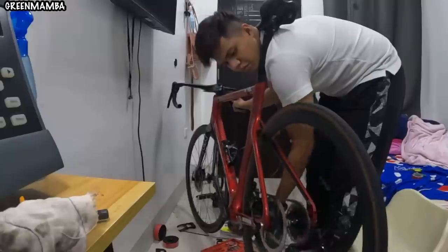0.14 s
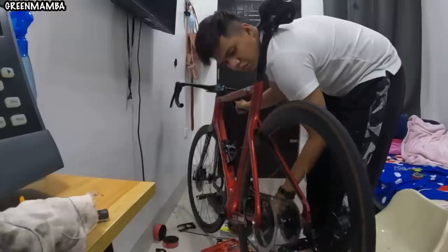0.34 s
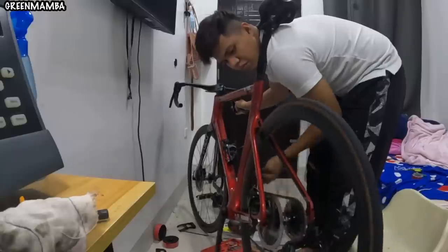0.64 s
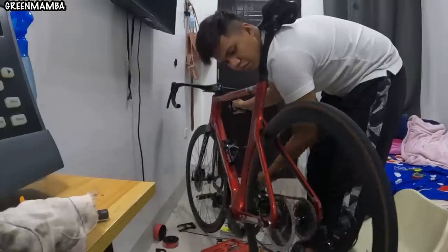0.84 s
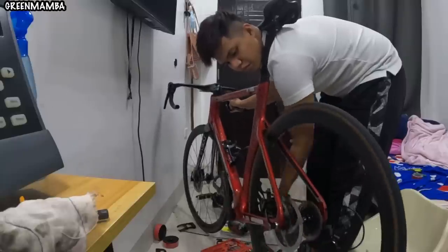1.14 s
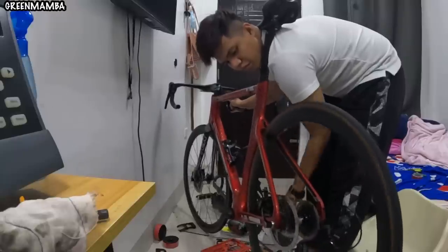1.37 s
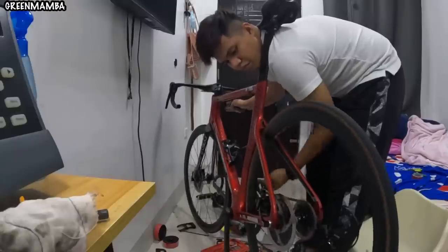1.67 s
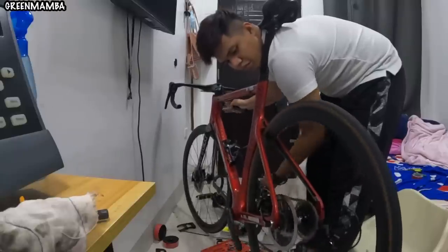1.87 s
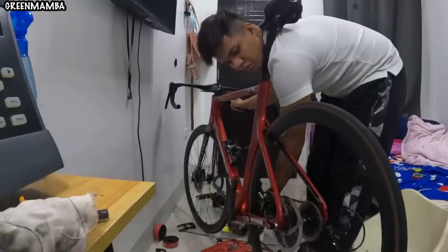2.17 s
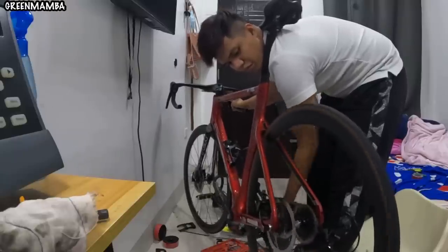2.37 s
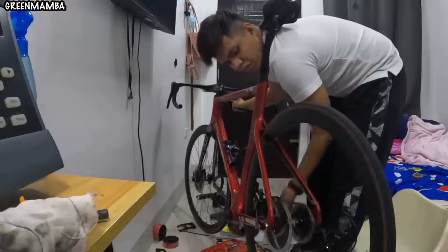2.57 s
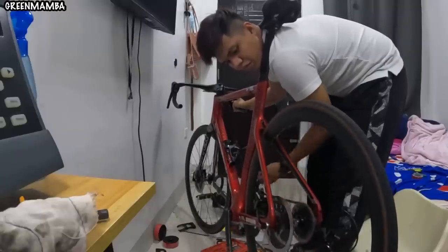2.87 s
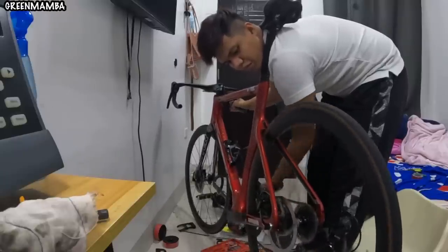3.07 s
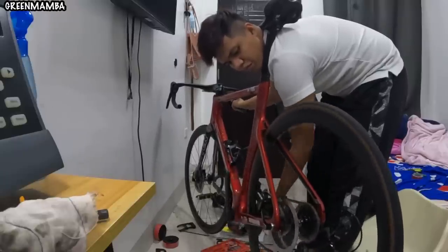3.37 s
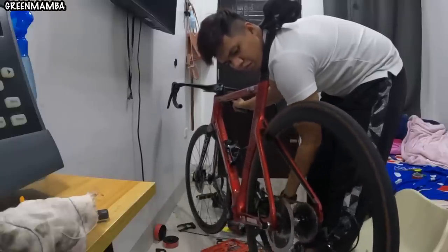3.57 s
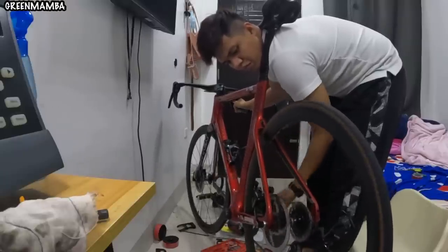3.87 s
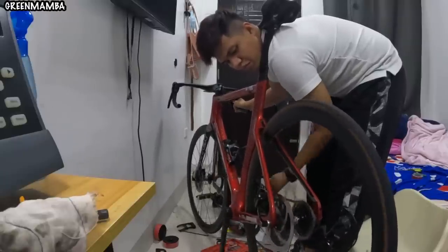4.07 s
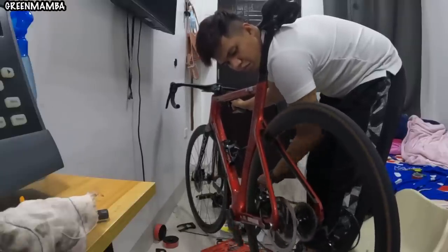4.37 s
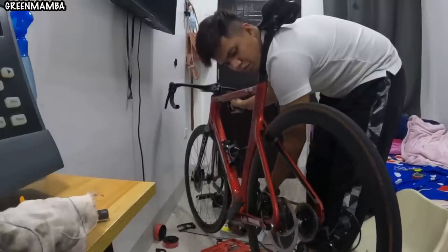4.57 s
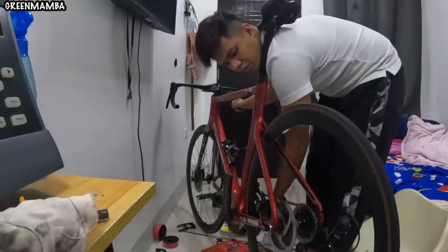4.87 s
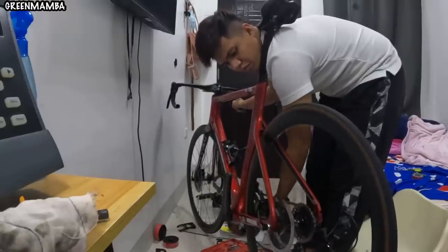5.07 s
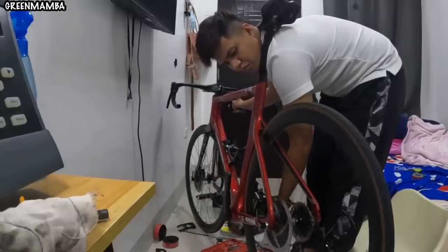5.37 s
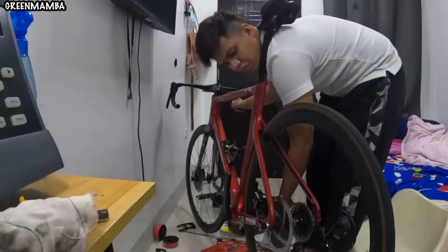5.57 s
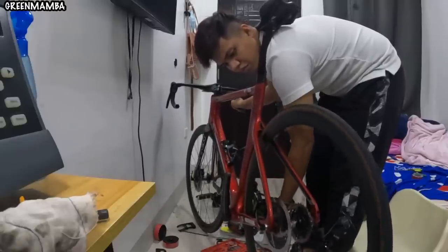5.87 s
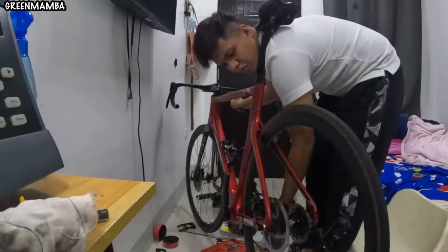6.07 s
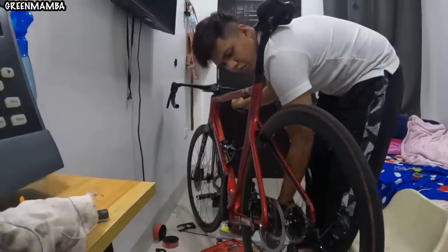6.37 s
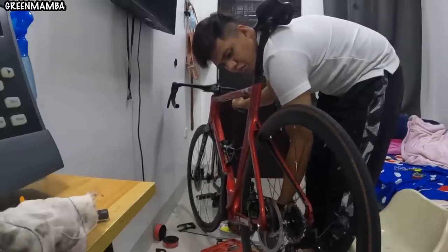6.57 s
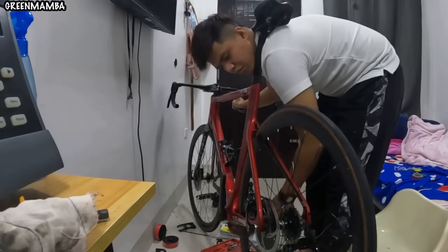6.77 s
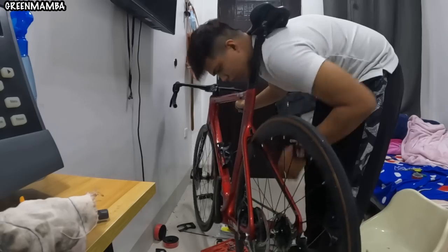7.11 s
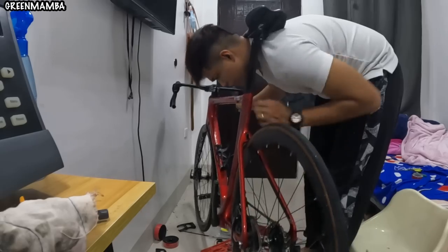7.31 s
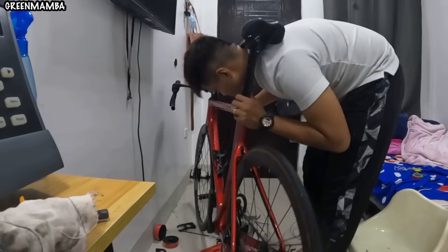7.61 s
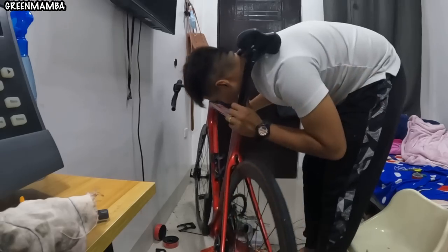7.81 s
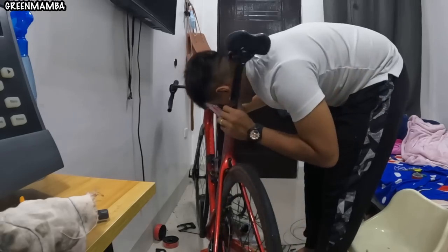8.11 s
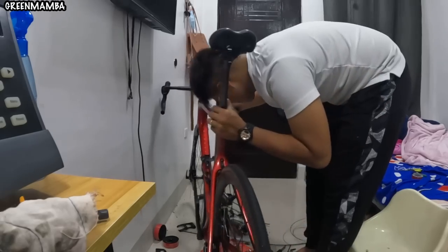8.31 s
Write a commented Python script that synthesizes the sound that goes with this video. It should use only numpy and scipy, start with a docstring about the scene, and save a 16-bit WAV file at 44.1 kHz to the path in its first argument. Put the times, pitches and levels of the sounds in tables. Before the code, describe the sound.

A close stereo microphone indoors catches a bicycle freehub ticking in uneven bursts, broken by short knocks and faint chain ticks. Low puffs of air and a faint distant motor drone lie beneath. After a clunk and a quick dying rattle, the ratchet accelerates into a dense ringing whirr, holds, then slows click by click. The end is quiet, with a small snap, a few light rubs and soft room air.

```python
"""Bicycle crank turned backwards

A bicycle stands in a small room and its crank is turned backwards by hand, in pushes and then in one long spin.
Spring-loaded pawls drop over the ratchet teeth, singly or as a buzz; each drop is a tiny noise burst that rings the hub.
The chain rustles in small ticks, the drivetrain knocks in the frame, and small parts snap and rattle.
Beneath lie room air, a low uneven rumble (both shaped noise) and the faint drone of a far motor (sine waves)."""
import sys
import numpy as np
from scipy import signal
from scipy.fft import rfft, irfft, next_fast_len
from scipy.io import wavfile
from scipy.ndimage import uniform_filter1d

SR = 44100
rng = np.random.default_rng(int(sys.argv[2]) if len(sys.argv) > 2 else 0)


def bounce(signal):
    """Save signal as a 16-bit WAV file at the path given by the first command-line argument."""
    frames = np.transpose(np.atleast_2d(signal))
    limited = np.clip(frames, -1, 1)
    pcm = np.round(limited * 32767).astype(np.int16)
    wavfile.write(sys.argv[1], SR, pcm)


N = 372644
TIME = np.arange(N) / SR
SIZE = next_fast_len(N + SR)
HZ = np.maximum(np.arange(SIZE // 2 + 1) * SR / SIZE, 1)

# All levels and strengths are relative settings; the mix and the room act on them later.
# Knocks of crank, chain and frame: t/s, strength/dB, main resonance f/Hz, bass/dB, clatter decay/ms
KNOCKS = [(.103, -27, 1360, 2.5, 6.2), (0.343, -28.5, 1440, 0, 7.9), (.53, -36.5, 330, 1, 13),
          (0.944, -29, 2580, -4, 8), (.953, -22.5, 2100, 7, 10), (.992, -25, 2480, -1, 9.3),
          (1.671, -21, 1600, -6, 9.5), (1.803, -24.5, 1650, -30, 1.8), (1.860, -30.5, 1310, 19, 12),
          (1.947, -23.5, 2780, -3, 13), (1.979, -19.5, 1670, -3.5, 6.1), (3.005, -31.5, 1430, 1.5, 4.1),
          (3.138, -20.5, 1620, -12, 7.2), (3.308, -19.5, 1720, -4.5, 7.3), (3.759, -32, 730, 5, 16),
          (3.879, -23, 2020, -4, 8.7), (3.892, -18.5, 1830, 6, 14), (6.950, -28.5, 1320, 5.5, 8.6),
          (8.429, -36.5, 1370, 8, 4.2)]
# One hollow clunk: t/s, strength/dB, contact decay/ms
CLUNK = (4.354, -21.5, 7)
# Its resonances: f/Hz, width/Hz, lift/dB
CLUNK_MODES = [(920, 170, 16), (1015, 120, 13), (1220, 170, 12), (1420, 130, 15), (3570, 400, 8)]
# Dry snaps of small parts, most in the gear change before the long spin:
# t/s, strength/dB, contact decay/ms, dull above f/Hz
SNAPS = [(4.4479, -24.5, 2, 5000), (4.4806, -28.5, 1, 9500), (4.498, -28.5, 1.5, 9500),
         (4.576, -35, 1.8, 6000), (6.9488, -31, 1.14, 5230)]
# The chain drops onto the next sprocket with a dying rattle:
# t/s, strength of first link/dB, time between links/s, loss per link/dB
SHIFT_RATTLE = (4.511, -29.5, .0065, 1.3)
# Far motor: t/s, base f/Hz, level/dB
MOTOR = [(2.4, 99.5, -62), (2.8, 102.5, -44), (4.1, 101.9, -46), (4.85, 104.9, -36.5), (5.5, 107.8, -48.5),
         (6.2, 101.6, -44), (6.9, 102.2, -54)]
# Its tones: multiple of the base f, level/dB
MOTOR_TONES = [(0.99, 0), (4 / 3, -5.5), (2.1, -17)]

# Broad colours of hub, frame, chain links, cloth, hollow part, small parts, rumble and room air: f/Hz, level/dB
HUB = [(150, -35), (500, -34.5), (900, -18), (1600, -7.5), (4900, -8), (6000, -3), (7150, 3.5),
       (8400, -4.5), (10000, -5), (12200, -9), (13500, -15), (15000, -47)]
FRAME = [(60, -14), (250, -6.5), (520, -3), (900, -2.5), (3500, -0.5), (5500, -3), (8000, -6), (12000, -37),
         (16000, -57)]
LINKS = [(100, -7), (350, -5.5), (1800, 1), (7000, 3), (10000, 1.5), (13000, 0.5), (15000, -46)]
CLOTH = [(150, -6.5), (1100, -5), (2000, -6), (5000, -12.5), (12000, -22), (15000, -60)]
HOLLOW = [(100, -21), (600, -8), (900, -4), (2300, -4.5), (5500, 1.5), (8000, -18), (14000, -33)]
SNAP = [(200, -21), (2200, -10.5), (3500, 5.5), (7000, 9), (12000, -4), (15000, -25)]
LOWS = [(25, -1), (42, 1), (55, 2.5), (100, -11.5), (160, -17), (400, -59)]
AIR = [(50, -71), (140, -72), (250, -81.5), (500, -83), (800, -90), (2000, -90), (7600, -96.5),
       (8800, -108), (12500, -114), (14500, -140)]
# Resonances of hub, frame and room air: f/Hz, width/Hz, lift/dB
HUB_MODES = [(1755, 180, 3.5), (2446, 190, 4.5), (3100, 290, 6), (3542, 46, 7.5), (4008, 52, 13.5),
             (4157, 45, 12), (4740, 74, 8), (5450, 96, 8), (6750, 100, 2), (8660, 130, 4.5), (9620, 210, 5)]
FRAME_MODES = [(305, 39, 8.7), (658, 7, 13), (1170, 44, 2.7), (1550, 79, 4), (2010, 6.9, 11),
               (2570, 120, 8.7), (3450, 170, 2.8), (4030, 180, 4.1)]
AIR_MODES = [(357, 5, 11.4), (417.6, 3.5, 10.5)]
# The hub's strongest ring comes and goes. Its band: lower f/Hz, upper f/Hz
RING_BAND_HZ = (3850, 4300)
# Gain of that band: t/s, level/dB
RING_SWELL = [(3.9, -1), (4.58, 1), (4.76, 7.5), (4.88, -1), (5.08, -1.5), (5.4, 3), (5.6, -2),
              (5.67, -8.5), (5.75, -1), (5.96, 1.5), (6.05, 1), (6.48, -4.5), (6.62, -8)]
# How far a knock's main resonance stands out: f/Hz, lift/dB
MAIN_LIFT = [(800, 15), (1400, 6), (1620, 11), (2100, 4)]

# Time the room takes to fade by 60 dB: f/Hz, fade time/s
ROOM_T60 = [(150, 0.62), (800, 0.51), (2500, 0.51), (6000, 0.45), (13000, 0.16)]
# How alike left and right are in sound from all around: f/Hz, likeness (1 = the same)
LIKENESS = [(30, 0.81), (150, 0.98), (800, 0.73), (1600, 0.68), (2600, 0.47), (4500, 0.48), (7000, 1),
            (10000, 0.66), (13000, 0.099)]
# Puffs of stirred air on the microphone: t/s, level/dB
PUFFS = [(.13, -28), (.34, -24.5), (.82, -27.5), (1.02, -27), (1.2, -25.5), (2.685, -22), (3.139, -27.5),
         (3.6, -27.5), (3.73, -23), (5.75, -28)]
# Jolts that set the whole frame booming: t/s, level/dB
BOOMS = [(1.68, -31), (1.99, -26.5), (3.316, -25)]
# Hands and clothes brushing the bicycle: start t/s, length/s, level/dB, release/s, main f/Hz, its lift/dB
BRUSHES = [(0, 4.8, -43.5, 1.0, 690, -0.5), (2.808, 0.04, -39.5, 0.073, 4500, 7),
           (6.829, 0.08, -47, .025, 1300, 8), (6.91, 0.047, -44, 0.013, 5240, 19.5),
           (7.101, .025, -47, .03, 1080, 21), (7.161, 0.055, -48.5, 0.03, 1060, 14),
           (7.768, 0.019, -52, 0.014, 3200, 14)]

# Pushes on the crank; the pace changes evenly up to a turning point and evenly again after it:
# first tooth t/s, turning point t/s, last tooth t/s, teeth, start pace, end pace (turning-point pace = 1)
PUSHES = [(0.013, 0.336, 0.506, 33, 0.41, 0.38), (0.532, 0.666, 0.78, 11, 0.77, 0.52),
          (0.941, 0.958, 1.017, 4, 3.93, 1.29), (1.173, 1.359, 1.399, 8, 0.87, 0.48),
          (1.668, 1.702, 1.765, 3, 0.82, 0.48), (1.804, 1.963, 2.12, 16, 0.67, 0.08),
          (2.433, 2.531, 2.615, 4, 0.8, 0.85), (3.13, 3.263, 3.439, 12, 0.35, 0.72),
          (3.469, 3.749, 3.806, 15, 0.68, 0.5), (3.874, 3.896, 4.068, 8, 3.85, 1.27),
          (4.104, 4.246, 4.356, 10, 0.86, 0.41)]
# The long spin gathers speed, holds and runs down: t/s, speed/(teeth per s)
SPIN = [(4.586, 27.2), (4.893, 70.7), (5.049, 118.1), (5.208, 107.3), (5.621, 105.9), (6.116, 78.5),
        (6.33, 55.1), (6.626, 8.2)]
SPIN_TEETH = 162

# Below the first rate the teeth click singly, above the second they merge into a buzz (teeth per s)
SINGLE_RATE, BUZZ_RATE = 25, 55
# In a buzz the teeth come very evenly and the pawls drop almost together
TOOTH_JITTER_S, BUZZ_SPREAD_S, PAWL_DECAY_MS = .00012, .002, 1.6
# A shorter contact is brighter: clatter giving the frame's plain treble, and treble gained at each halving
PLAIN_CLATTER_MS, TREBLE_DB_PER_HALVING = 6.2, 5
# The chain is louder the faster it runs: level at 100 teeth per s, rise, creep between pushes (teeth per s)
CHAIN_DB, CHAIN_DB_PER_DOUBLING, CREEP_RATE = -37.5, 2.5, 7.5
BRUSH_ATTACK_S, BRUSH_WIDTH_SHARE = 0.0024, 0.24
# Share of the snaps and lone ticks sent into the room step; the rest skips it
SNAP_ROOM_SHARE = .68
AIR_DB, CUTOFF_HZ = -46, 15900


def amp(db):
    """Turn decibels into a gain."""
    return 10 ** (np.asarray(db) / 20)


def rms_one(x):
    """Scale a sound to an average strength (rms) of 1."""
    return x / np.sqrt(np.mean(x ** 2) + 1e-20)


def in_time(rows):
    """Read each column of a timed table at every sample."""
    s, *columns = np.transpose(rows)
    return [np.interp(TIME, s, column) for column in columns]


def at_hz(points, hz):
    """Read a table between its points, along log frequency."""
    f, value = np.transpose(points)
    return np.interp(np.log(hz), np.log(f), value)


def colour(points, modes, hz):
    """A broad spectrum in dB with resonance peaks on it."""
    peaks = sum((amp(lift) ** 2 - 1) / (1 + (2 * (hz - f) / width) ** 2) for f, width, lift in modes)
    return at_hz(points, hz) + 10 * np.log10(np.maximum(1 + peaks, 1e-2))


def body(points, modes, size=16384):
    """How a struck body of this colour rings: at once, then fading (minimum phase); its energy is 1."""
    hz = np.maximum(np.arange(size // 2 + 1) * SR / size, 1)
    cepstrum = irfft(np.log(amp(colour(points, modes, hz))))
    # keeping only the forward half of the cepstrum puts the ring after the blow
    forward = 2 * cepstrum[:size // 2] * (np.arange(size // 2) > 0)
    ring = irfft(np.exp(rfft(forward, size)))
    return ring / np.linalg.norm(ring)


def add(track, s, piece):
    """Mix a piece into a track at time s."""
    i = int(np.clip(s * SR, 0, N - 1))
    track[i:i + len(piece)] += piece[:N - i]


def diffuse(points, modes=()):
    """Stereo noise from all around, more alike left and right at some pitches than at others; rms 1."""
    alike = np.clip(at_hz(LIKENESS, HZ), -1, 1)
    mid, side = rfft(rng.standard_normal((2, SIZE))) * amp(colour(points, modes, HZ))
    mid = irfft(mid * np.sqrt(1 + alike), SIZE)
    side = irfft(side * np.sqrt(1 - alike), SIZE)
    return rms_one(np.array([mid + side, mid - side])[:, :N])


def contact(decay_ms, grain_db, size=4096):
    """One impact with its chatter of tiny rebounds; it has the energy of 20 ms of noise with rms 1."""
    grain = np.clip(rng.standard_normal(size), -2, 2)
    chatter = rng.standard_normal(size) * amp(grain_db * grain)
    burst = chatter * np.exp(-TIME[:size] / (max(decay_ms, .1) * 1e-3))
    return burst / np.linalg.norm(burst) * np.sqrt(SR / 50)


def tooth_times(s, pace, count):
    """When each of a run of teeth goes by, for a pace that changes evenly between the times s."""
    t = np.linspace(s[0], s[-1], 2000)
    speed = np.interp(t, s, pace)
    turned = np.cumsum(speed) - speed[0]
    return np.interp(np.linspace(0, turned[-1], count), turned, t)


def ratchet_runs():
    """The tooth times of every push and of the long spin."""
    runs = []
    for first, turn, last, teeth, start_pace, end_pace in PUSHES:
        runs.append(tooth_times([first, turn, last], [start_pace, 1, end_pace], count=int(teeth)))
    return runs + [tooth_times(*np.transpose(SPIN), count=SPIN_TEETH)]


def room(x, early_db=0.0, early_s=0.019, late_db=-2, build_s=0.01, size=4096):
    """Direct sound, quick reflections, then a tail whose treble dies first.
    Wheel and mechanic keep moving, so each short stretch of sound meets a new pattern of reflections."""
    t, noise = TIME[:SR], diffuse([(1, 0), (SR, 0)])
    spectrum, centres = rfft(noise, SIZE), [hz for hz, _ in ROOM_T60]
    # split the noise into overlapping pitch bands, each with its own fade
    bands = [irfft(spectrum * at_hz(list(zip(centres, share)), HZ), SIZE) for share in np.eye(len(centres))]
    decays = [amp(-60 * t / t60) * (1 - np.exp(-t / build_s)) for _, t60 in ROOM_T60]
    early_decay = np.exp(-t / early_s) * (t > .001)
    out, padded = np.zeros((2, N + 2 * SR)), np.pad(x, (size, 2 * size))
    fade = np.sqrt(signal.get_window("hann", 2 * size))
    for i in range(0, N + size, size):
        j = rng.integers(N - SR)  # a random piece of noise is the new pattern
        tail = sum(band[:, j:j + SR] * decay for band, decay in zip(bands, decays))
        early = noise[:, j:j + SR][:, ::-1] * early_decay
        response = (amp(early_db) * rms_one(early) + amp(late_db) * rms_one(tail)) / np.sqrt(SR)
        stretch = padded[i:i + 2 * size] * fade
        echo = signal.fftconvolve(stretch[None], response, axes=1)
        out[:, i:i + echo.shape[1]] += echo
    return (x + out[:, size:size + N]) / np.sqrt(1 + amp(early_db) ** 2 + amp(late_db) ** 2)


def brushing():
    """Cloth or skin rubs as soft noise; each brush swells, holds and dies away, with a pitch of its own."""
    out = 0
    for s, length, db, release_s, hz, lift_db in BRUSHES:
        attack = np.clip((TIME - s) / BRUSH_ATTACK_S, 0, 1)
        release = np.exp(-np.maximum(TIME - s - length, 0) / release_s)
        cloth = diffuse(CLOTH, [(hz, BRUSH_WIDTH_SHARE * hz, lift_db)])
        out = out + amp(db) * attack * release * cloth
    return out


def rumble(steady_db=-41, stirred_db=-41, puff_s=0.034, puff_top_hz=62):
    """A steady low rumble; until the spin ends stirred air adds to it, and deeper puffs reach the microphone."""
    running = TIME < SPIN[-1][0]
    power = amp(steady_db) ** 2 + amp(stirred_db) ** 2 * uniform_filter1d(running * 1., SR // 2)
    puff_power = sum(amp(db) ** 2 * np.exp(-((TIME - s) / puff_s) ** 2) for s, db in PUFFS)
    low_pass = signal.butter(1, puff_top_hz, fs=SR, output="sos")
    deep = rms_one(signal.sosfilt(low_pass, diffuse(LOWS)))
    left_right_gain = amp([[-1], [1]])
    return (np.sqrt(power) * diffuse(LOWS) + np.sqrt(puff_power) * deep) * left_right_gain


def far_motor(waver_db=2):
    """A drone of a few sine tones that rises and sinks a little beyond the walls."""
    hz, level_db = in_time(MOTOR)
    phase = 2 * np.pi * np.cumsum(hz) / SR
    knots = np.linspace(0, N / SR, 40)
    out = np.zeros(N)
    for multiple, db in MOTOR_TONES:
        waver = np.interp(TIME, knots, rng.normal(0, waver_db, len(knots)))
        out += np.sqrt(2) * amp(level_db + db + waver) * np.sin(multiple * phase)
    return out


def room_air():
    """The faint hush of the room: steady noise with two narrow resonances."""
    return amp(AIR_DB) * diffuse(AIR, AIR_MODES)


def loose_links(ticks_per_s=16, tick_db=-47, uneven_db=3):
    """Before the long spin, chain links settle at random moments with faint lone ticks."""
    force = np.zeros(N)
    for s in rng.uniform(0, SPIN[0][0], int(ticks_per_s * SPIN[0][0])):
        tick = contact(decay_ms=1.0, grain_db=8, size=1024)
        add(force, s, amp(tick_db + rng.normal(0, uneven_db)) * tick)
    return signal.fftconvolve(force, body(LINKS, ()))[:N]


def chain_level():
    """Chain level in dB from crank speed; the chain creeps between pushes and all but vanishes after the spin."""
    rate = CREEP_RATE * (TIME < SPIN[0][0])
    for run in ratchet_runs():
        rate = rate + np.interp(TIME, run, 1 / np.gradient(run), left=0, right=0)
    smooth_rate = np.maximum(uniform_filter1d(rate, SR // 20), 1e-4)
    doublings = np.log2(smooth_rate / 100)
    return CHAIN_DB + CHAIN_DB_PER_DOUBLING * doublings


def chain(links_per_s=70, uneven_db=4.5):
    """Rollers seat on the sprockets in a stream of small uneven ticks; crank speed sets only their level."""
    force = np.zeros(N)
    for s in np.arange(0, N / SR, 1 / links_per_s):
        tick = contact(decay_ms=4.6, grain_db=3.5, size=1024)
        add(force, s + rng.normal(0, .003), amp(rng.normal(0, uneven_db)) * tick)
    rustle = signal.fftconvolve(force, body(LINKS, HUB_MODES[:7]))[:N]
    return amp(chain_level()) * rms_one(rustle)


def pawls(tooth_s, level_db, spread_s, count=3):
    """The pawls drop in close succession over one tooth: (s, impact) for each."""
    drops = []
    for k in range(count):
        delay_s = spread_s * (k + rng.normal(0, .25)) / (count - 1) * (k > 0)
        impact = contact(PAWL_DECAY_MS, grain_db=2.5) / np.sqrt(count)
        drops.append((tooth_s + delay_s, amp(level_db + rng.normal(0, 1.0)) * impact))
    return drops


def swell_ring(x):
    """The band of the strongest ring swells and sinks while the rest stays."""
    band_pass = signal.butter(2, RING_BAND_HZ, "band", fs=SR, output="sos")
    ring = signal.sosfiltfilt(band_pass, x)
    return x + (amp(in_time(RING_SWELL)[0]) - 1) * ring


def freehub(tooth_db=-25.5, uneven_db=0.4, slow_spread_s=.0036, slow_db=1.0):
    """Springs snap about equally at every tooth, so faster is louder; hub, cassette and spokes ring."""
    force = np.zeros(N)
    for run in ratchet_runs():
        slowness = np.interp(1 / np.gradient(run), [SINGLE_RATE, BUZZ_RATE], [1, 0])
        for at, slow in zip(run, slowness):
            level_db = tooth_db + slow * slow_db + rng.normal(0, uneven_db)
            spread_s = BUZZ_SPREAD_S + slow * (slow_spread_s - BUZZ_SPREAD_S)
            for s, impact in pawls(at + rng.normal(0, TOOTH_JITTER_S), level_db, spread_s):
                add(force, s, impact)
    return swell_ring(signal.fftconvolve(force, body(HUB, HUB_MODES))[:N])


def knocks(main_width_hz=400):
    """Slack is taken up with a short clatter; each blow favours its own part of the frame's ring."""
    out = np.zeros(N)
    for s, level_db, main_hz, bass_db, clatter_ms in KNOCKS:
        treble_db = TREBLE_DB_PER_HALVING * np.log2(PLAIN_CLATTER_MS / clatter_ms)
        tilt = [(450, bass_db), (1400, 0), (4500, treble_db)]  # f/Hz, level/dB
        points = [(hz, db + at_hz(tilt, hz)) for hz, db in FRAME]
        main_mode = (main_hz, main_width_hz, at_hz(MAIN_LIFT, main_hz))
        ring = body(points, FRAME_MODES + [main_mode])
        add(out, s, amp(level_db) * signal.fftconvolve(contact(clatter_ms, grain_db=4), ring))
    return out


def booms(hz=145, t60=0.51, swell_s=0.0088):
    """The frame's low bending mode swells after a jolt and dies slowly."""
    out, t = np.zeros(N), TIME[:SR]
    fade = np.exp(-np.log(1000) * t / t60)
    ring = np.sin(2 * np.pi * hz * t) * (1 - np.exp(-t / swell_s)) * fade
    for s, db in BOOMS:
        add(out, s, amp(db) * ring)
    return out


def clunk():
    """A short blow on something hollow, which rings mainly in a cluster of close resonances."""
    s, level_db, contact_ms = CLUNK
    out = np.zeros(N)
    ring = body(HOLLOW, CLUNK_MODES)
    add(out, s, amp(level_db) * signal.fftconvolve(contact(contact_ms, grain_db=5.0), ring))
    return out


def snaps():
    """Small steel parts snap into place, bright and almost without ring."""
    out = np.zeros(N)
    for s, level_db, contact_ms, dull_hz in SNAPS:
        points = [(hz, db - 10 * np.log10(1 + (hz / dull_hz) ** 4)) for hz, db in SNAP]
        ring = body(points, ())
        add(out, s, amp(level_db) * signal.fftconvolve(contact(contact_ms, grain_db=3.5), ring))
    return out


def shift_rattle(count=9):
    """Link after link slaps onto the new sprocket, each set softer than the last, and the cassette rings."""
    s, level_db, gap_s, loss_db = SHIFT_RATTLE
    force = np.zeros(N)
    for k in range(count):
        slap_s = s + gap_s * (k + rng.uniform(-.5, .5))
        add(force, slap_s, amp(level_db - loss_db * k) * contact(PAWL_DECAY_MS, grain_db=2))
    return signal.fftconvolve(force, body(HUB, HUB_MODES))[:N]


def scene():
    """The bicycle in its room, over the background; the small snaps and ticks arrive more directly."""
    small = loose_links() + snaps()
    drivetrain = chain() + amp(-2.0) * freehub() + amp(-0.5) * knocks() + clunk() + shift_rattle()
    in_room = room(drivetrain + SNAP_ROOM_SHARE * small)
    bicycle = in_room + (1 - SNAP_ROOM_SHARE) * small + booms()
    return bicycle + brushing() + rumble() + far_motor() + room_air()


def record(dry):
    """A steep low-pass filter removes the very top of the treble."""
    low_pass = signal.ellip(10, .1, 80, CUTOFF_HZ, fs=SR, output="sos")
    return signal.sosfilt(low_pass, dry)


dry = scene()
out = record(dry)
bounce(out)
```